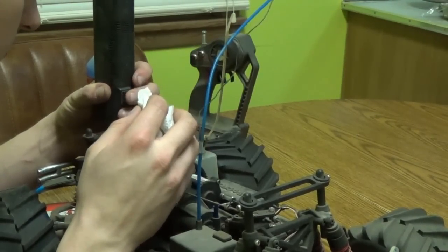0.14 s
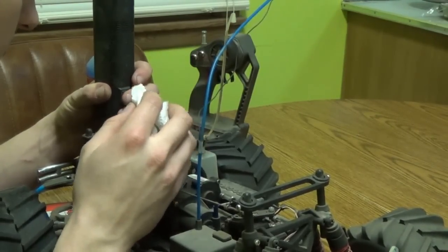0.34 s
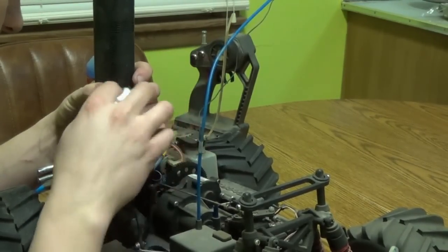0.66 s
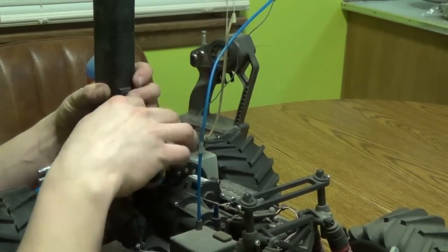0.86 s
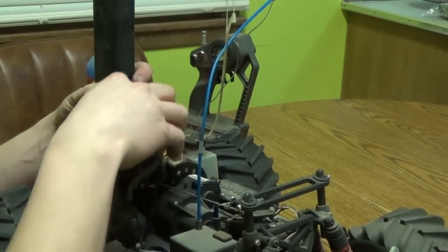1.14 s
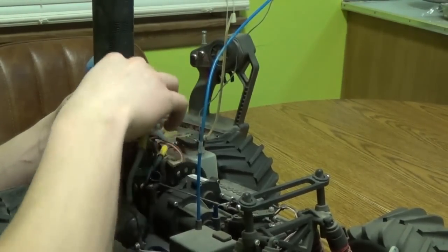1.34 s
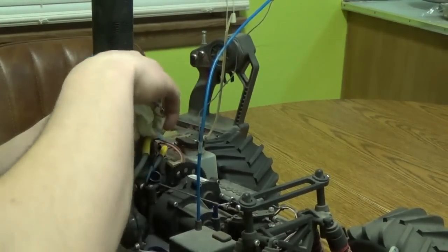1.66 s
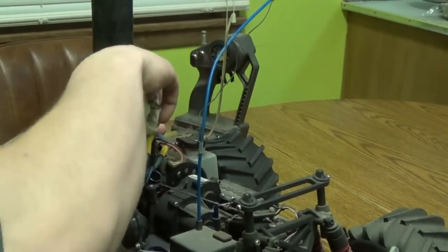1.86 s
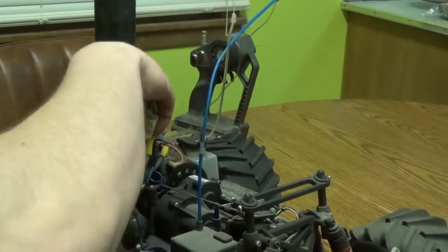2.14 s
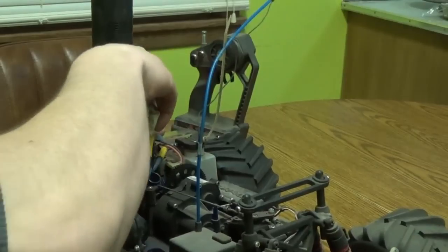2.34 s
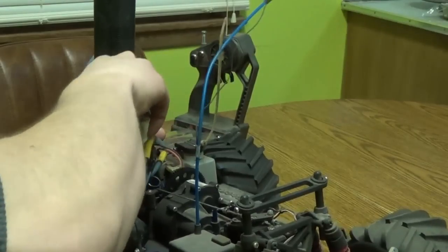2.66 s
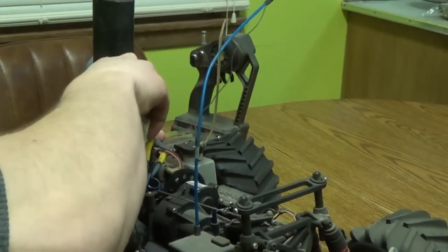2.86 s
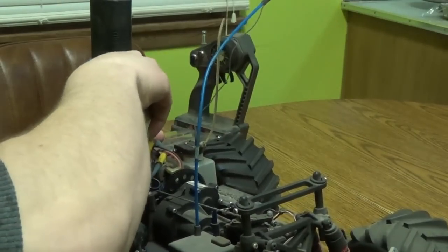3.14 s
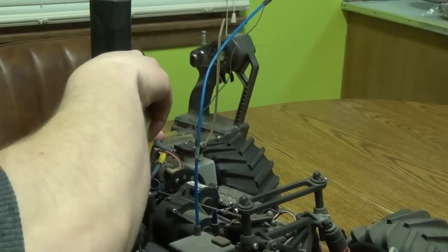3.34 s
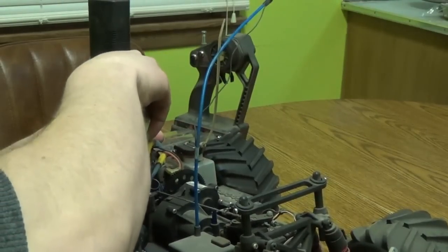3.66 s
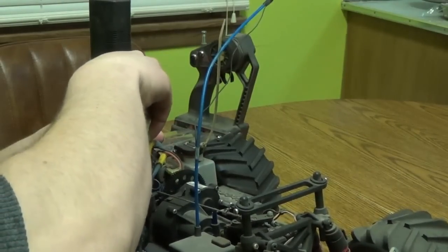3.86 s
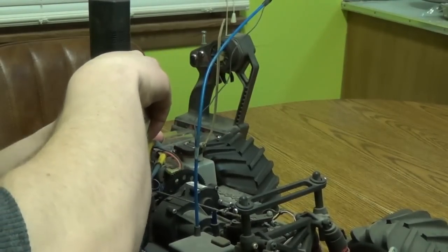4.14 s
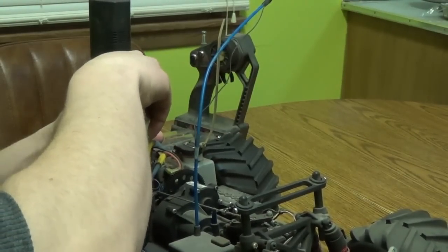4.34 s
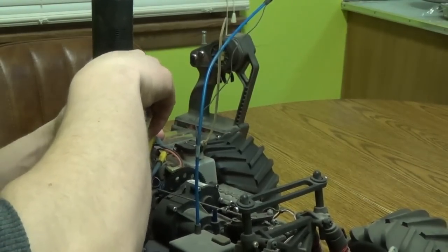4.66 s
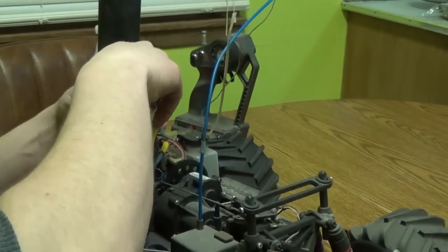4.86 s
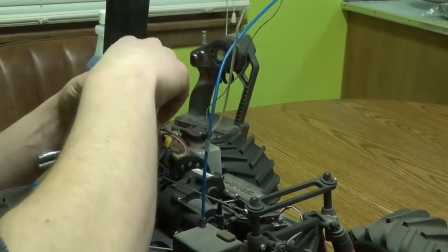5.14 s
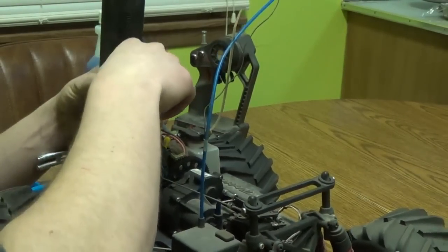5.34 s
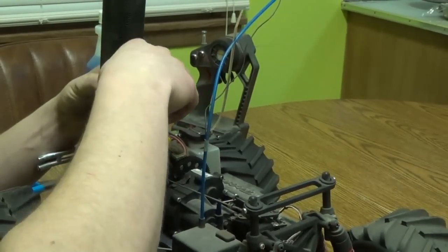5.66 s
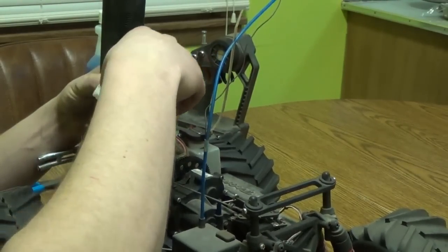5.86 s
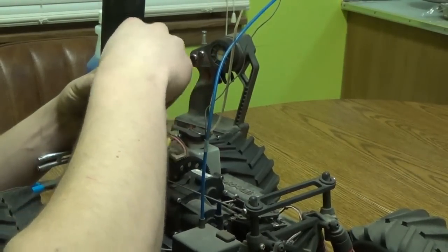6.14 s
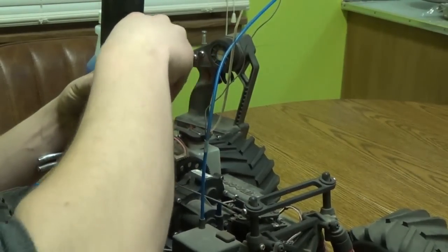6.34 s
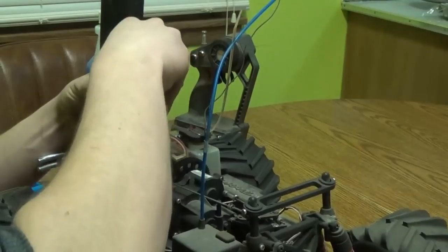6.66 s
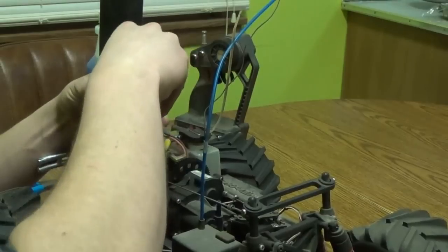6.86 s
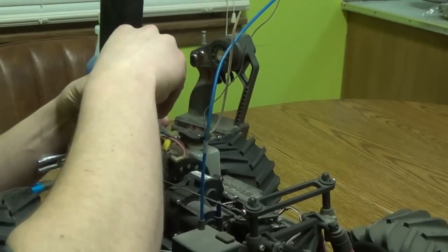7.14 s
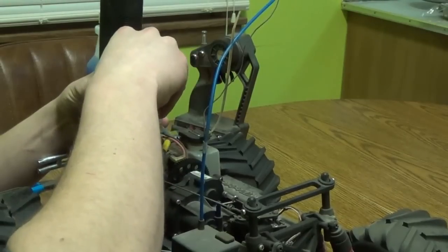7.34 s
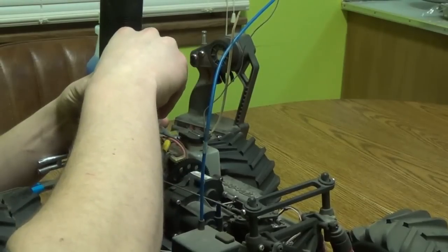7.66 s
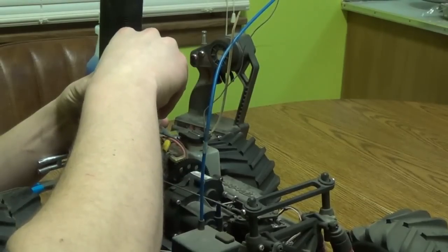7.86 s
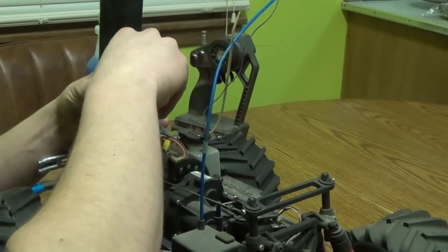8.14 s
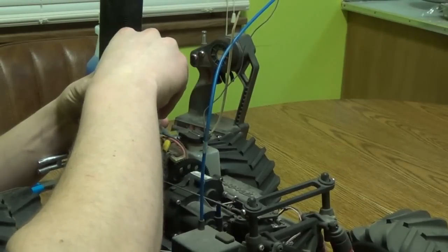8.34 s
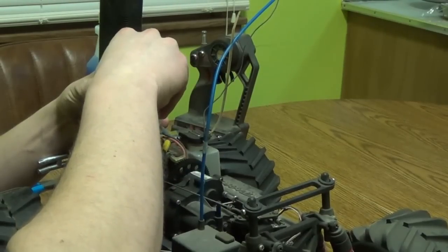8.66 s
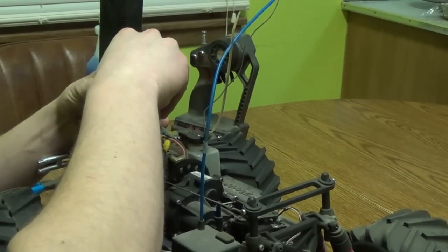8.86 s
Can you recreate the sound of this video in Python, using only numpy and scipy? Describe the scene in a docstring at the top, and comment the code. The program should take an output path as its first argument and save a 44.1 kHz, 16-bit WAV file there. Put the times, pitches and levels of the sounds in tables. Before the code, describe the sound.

Close up in a quiet kitchen, an electric starter is already cranking a small model engine: a bright, rattling gear whir with popping exhaust. It cuts after half a second with a brief freewheel hiss. Soft paper towel crackles and light chassis knocks fill the pause. Then the starter snaps on again and grinds on steadily to the end, whining and popping about sixteen times a second, the engine never catching.

```python
"""Kitchen table in a quiet room, close stereo microphone: a hand-held electric starter cranks
a small model engine twice; it does not fire. The gears rattle in the casing, whine at the rate
the teeth mesh, and hiss as the freewheel overruns; each crank turn pops the exhaust pipe once.
Between the tries, hands crackle a paper towel and nudge the chassis. Behind it all lie room air,
preamp hiss, faint steady tones and a regular tick."""
import sys
import numpy as np
from scipy import signal
from scipy.fft import rfft, irfft, next_fast_len
from scipy.io import wavfile
from scipy.ndimage import uniform_filter1d

SR = 44100
rng = np.random.default_rng(int(sys.argv[2]) if len(sys.argv) > 2 else 0)


def transcribe(u):
    """Save the signal u as a 16-bit wav file named by the first command-line argument.

    u: samples, shape (n,) or (channels, n), limited to [-1, 1]; the rate is SR.
    q: integer samples, one column per channel.
    """
    v = np.clip(np.atleast_2d(u).T, -1, 1)
    q = np.round(v * 32767).astype(np.int16)
    wavfile.write(sys.argv[1], SR, q)


N = 396459
T = np.arange(N) / SR  # seconds

# Levels are those ahead of the final mix and microphone; colour tables give only relative level.
# first try, crank turning unevenly, a row per exhaust port opening: time_s, pop_level_db
FIRST_TRY_POPS = [(0, -33), (.0581, -18.5), (.1291, -15), (.1915, -17.5), (.2583, -19.5), (.3521, -18.5),
                  (.4191, -20), (.4819, -17), (.5437, -17.5), (.6074, -17.5), (.724, -29)]
# second try from its first pop on: time_s, speed_turns_per_s
CRANK_SPEED = [(3.2283, 14.305), (3.4, 15.844), (3.9, 16.572), (4.8, 16.642), (5.0, 16.223), (5.4, 16.437),
               (6.6, 16.563), (7.4, 16.814), (9, 16.855)]
OFF_S, STOP_S, ON_S = 0.6, 0.9, 3.146  # power off, crank at rest, power on again
REST_TURNS = 0.8  # the crank rests this far past the last pop
# how far the hand has slid along the casing: time_s, grip_0_to_1
HAND_SLIDE = [(0, .35), (3.2, .07), (3.45, .4), (4.8, .35), (5.6, .5), (7.86, 1), (8.99, .7)]
# rattle colour under the grip of the first try: frequency_hz, level_db_per_hz
FIRST_TRY_COLOUR = [(30, -36), (80, -38), (130, -28), (320, -18), (500, -24), (900, -17.5), (1350, -14.5),
                    (1620, -8.5), (2180, -7.5), (3040, -1), (4350, -9), (6600, -5), (8580, -11),
                    (11400, -10), (14000, -14), (15600, -22)]
# rattle colour at the two grips of the second try: frequency_hz, level_db_per_hz
LOW_GRIP_COLOUR = [(30, -34), (80, -40), (130, -32), (320, -19), (550, -21), (900, -17.5), (1210, -13.5),
                   (1950, -3.5), (2130, -6.5), (2630, -4), (3040, -0.5), (4840, -8), (6000, -4),
                   (7180, -6.5), (12400, -7.5), (15600, -15)]
HIGH_GRIP_COLOUR = [(30, -35), (80, -38), (130, -27), (320, -15), (550, -18.5), (900, -18), (1430, -10),
                    (1600, -7.5), (2800, -7), (3190, -1.5), (4350, -11), (6930, -8), (8280, -10.5),
                    (10900, -8.5), (13700, -15.5), (15600, -25)]
# fixed resonances of casing and room: frequency_hz, width_hz, low_grip_db, high_grip_db
FIXED_RESONANCES = [(735, 30, 13, 12), (1633, 72, 6, -1), (2410, 120, -4, -9), (2782, 25, -8, -1),
                    (2953, 34, -12, 6), (3050, 26, -5, 9), (3143, 18, 5, 13), (3271, 18, 2, 11),
                    (3540, 33, 4, -4), (3790, 80, 4, 0), (5115, 13, -11, 0), (5580, 190, -7, -3),
                    (6060, 120, 2.5, -3), (6880, 95, -3, 4), (7690, 46, -5, 12), (9700, 390, 1.5, -13)]
# rattle swelling with crank angle: times_per_turn, depth_db, lag_turns, deepest_at_hz
ANGLE_BEATS = [(1, 2, .15, 1800), (1, 1.3, 0.58, 3200), (1, 0.7, 0.6, 12000), (4, -0.5, .1, 3100),
               (8, 0.9, .2, 3100), (12, 1, 0.29, 1700)]
# tooth mesh tones: teeth_per_turn, level_db (re rattle)
MESH_TONES = [(118.3, -18.5), (96.3, -27.5), (128.5, -30), (189, -23), (302, -31), (402.6, -28)]
# fuzzy whines following the speed:
# times_per_turn, width_hz, base_db (times 1.5 - grip), added_db (times grip)
HOWL_BANDS = [(187.4, 125, -11, -10.5), (367, 170, -10, -31)]
# gear level: first_try_db, second_try_db
GEAR_DB = (-17.8, -17)
ENGAGE_S, ENGAGE_BEND = 0.045, 1.35  # rise at power on: seconds, power of time
RUNDOWN_S, RUNDOWN_BEND = 0.105, 2.6  # seconds after power off to lose 10 dB; power of time
# hiss of the overrunning freewheel: frequency_hz, level_db_per_hz
FREEWHEEL_COLOUR = [(240, -46), (400, -12), (502, -31), (701, -13), (1120, -19), (1610, -1.5), (2620, -10),
                    (3660, 0), (5110, -15), (10900, -16), (15000, -28)]
COAST_DB, COAST_PEAK_S = -22.5, 0.655
COAST_RISE_S, COAST_FALL_S, COAST_BEND = 0.04, 0.125, 1.8  # seconds per 10 dB; bend of the fall
# exhaust pipe and table top ringing after a pop: frequency_hz, level_db, t60_s, rise_s
PIPE_MODES = [(136, -22, 0.28, 0.0017), (205, -15, 0.15, 0.0016), (279, -13, 0.031, 0.0012),
              (320, -12, 0.16, 0.0023), (322, 4, 0.066, .0028), (438.4, -7, 0.04, 0.0021),
              (549.3, -18.5, 0.18, 0.0028), (595, -11.5, 0.058, 0.0014), (638, -17.5, 0.2, 0.0014),
              (685, -16, 0.18, 0.0014), (701, -9, 0.13, 0.003), (673, -15, 0.057, .0008),
              (735.6, -8.5, 0.28, 0.0067), (758, -25, 0.52, 0.006), (797, -20.5, 0.24, 0.0057),
              (838, -25, 0.18, 0.0011), (1100, -25, 0.03, 0.00039)]
POP_DB, POP_GROWTH_DB_PER_S = -18.5, 0.3  # second try: the pops grow a little as it runs
# paper towel colour: frequency_hz, level_db_per_hz
TOWEL_COLOUR = [(88, -64), (150, -61), (230, -38), (269, -10), (620, -4), (710, -8), (1490, 3),
                (14400, -10), (15600, -16.5)]
# paper towel, a row per crumple: peak_s, level_db, rise_s, fall_s (each over 10 dB)
TOWEL_CRUMPLES = [(.89, -52, .03, .2), (1.1, -50, .15, .2), (1.31, -50, .1, .1), (1.47, -49, .1, .16),
                  (1.72, -54, .07, .1), (1.86, -52, .08, .3), (2.03, -50, .04, .05), (2.144, -47, .004, .2),
                  (2.45, -53, .07, .08), (2.64, -55, .02, .05), (2.99, -48, .004, .014),
                  (3.09, -60, .1, .05)]
# nudges of the chassis: start_s, level_db, thud_hz, t60_s, scuff_db
CHASSIS_NUDGES = [(1.73, -59, 300, .15, -70), (1.888, -49, 314, 0.068, -66), (2.03, -52, 403, .08, -58),
                  (2.142, -50, 865, 0.34, -40), (2.21, -62, 1500, .3, -65), (2.425, -61, 300, .3, -56),
                  (2.79, -55, 320, 0.17, -52.5), (2.972, -51, 340, .12, -60), (2.992, -68, 900, .06, -60),
                  (3.093, -66, 600, .06, -62)]
# chassis modes around a thud: factor on thud_hz, level_db, factor on t60_s
CHASSIS_MODES = [(1, 4.5, 0.39), (1.45, -3.5, 0.67), (2.3, -1.5, .45), (3.7, -5.5, .3), (6.1, -8.5, .2)]
# scuff colour: frequency_hz, level_db_per_hz
SCUFF_COLOUR = [(120, -49), (200, -22), (597, -5), (829, -2), (1090, -8), (1920, -2), (2760, -13),
                (5520, -15), (15600, -42)]
# echo decay in the room: frequency_hz, t60_s
ROOM_DECAY = [(150, 0.42), (700, 0.28), (3000, 0.47), (8000, 0.37), (15000, 0.14)]
# room air and preamp hiss: frequency_hz, level_db_per_hz
FLOOR_COLOUR = [(15, -54), (25, -27), (75, -13.5), (234, -2), (764, -1.5), (922, 2), (1110, -2), (3950, -3),
                (12900, -8.5), (15600, -8)]
FLOOR_DB = -57.5
# mains hum and a screen's scan whistle: frequency_hz, level_db
STEADY_TONES = [(240, -80.5), (7881, -81.5), (15735, -75)]
# faint regular tick running throughout, a single row:
# one_tick_at_s, ticks_per_s, pitch_hz, level_db, t60_s
FAINT_TICK = (.982, 14.985, 3900, -53, .011)
# lean of the port pair: frequency_hz, left_minus_right_db
PORT_LEAN = [(60, -7), (125, 2.5), (300, 1.1), (700, -2.5), (1400, -.5), (3000, -2), (5000, 0.1),
             (9000, 1.2)]
# stereo width of the sound: frequency_hz, side_gain_db
STEREO_WIDTH = [(60, -1.5), (125, -1.5), (300, -3.5), (700, 5.5), (1500, -5), (3000, -2), (6000, -2),
                (8500, -8), (11000, -36)]
# microphone response: frequency_hz, gain_db
MIC_RESPONSE = [(25, 1), (70, -4), (110, -7), (140, 0.4), (13000, -1.05), (15000, -2.5), (15700, -8)]
BAND_LIMIT_HZ = 15790


def starter():
    """Both tries: gear noise under the motor's power envelope, freewheel hiss, and exhaust pops."""
    turns = crank()
    grip = np.clip(curve(HAND_SLIDE, order=1), 0, 1)
    since_off = np.maximum(T - OFF_S, 0)
    first_try = gain_of(GEAR_DB[0] - 10 * (since_off / RUNDOWN_S) ** RUNDOWN_BEND)
    engaging = np.clip((T - ON_S) / ENGAGE_S, 0, 1) ** ENGAGE_BEND
    second_try = gain_of(GEAR_DB[1]) * engaging
    gears = (first_try + second_try) * (rattle(turns, grip) + whine(turns) + howl(turns, grip))
    later_pop_db = POP_DB + POP_GROWTH_DB_PER_S * (T - ON_S)
    pop_db = np.where(T < ON_S, curve(FIRST_TRY_POPS, order=1), later_pop_db)
    return gears + freewheel(), exhaust(turns, pop_db)


def crank():
    """Crank angle in turns: uneven first turns, a rest, then a run at the tabled speed."""
    opens = [time for time, db in FIRST_TRY_POPS]
    count = len(opens)
    again = CRANK_SPEED[0][0]
    rest = count - 1 + REST_TURNS
    times = opens + [STOP_S, ON_S, again]
    slow = np.interp(T, times, [*range(count), rest, rest, count])
    return slow + np.cumsum((T >= again) * curve(CRANK_SPEED, order=1)) / SR


def rattle(turns, grip):
    """Dense tooth knocks ring fixed resonances; some weaken and others grow as the hand slides."""
    hz, t, z = signal.stft(grains(per_s=16000, spread_db=1.9), SR, nperseg=256, noverlap=192)
    angle = np.interp(t, T, turns)
    beat_db = 0
    for times, depth_db, lag, centre_hz in ANGLE_BEATS:
        nearness = np.exp(-np.log((hz[:, None] + 1) / centre_hz) ** 2 / 0.21)
        beat_db = beat_db + depth_db * nearness * np.cos(2 * np.pi * times * (angle - lag))
    patches = uniform_filter1d(rng.standard_normal(z.shape), 3, 0)  # blurred over frequency
    patches = evened(uniform_filter1d(patches, 60, 1))  # and over time
    # the grip shakes, heard most in the treble
    flutter = np.interp(t, T, drift(31)) * np.clip(hz[:, None] / 8000, 0, 1)
    shaped = z * gain_of(beat_db + 0.73 * patches + 0.45 * flutter)
    knocks = signal.istft(shaped, SR, nperseg=256, noverlap=192)[1][:N]

    size = next_fast_len(N)
    hz = np.fft.rfftfreq(size, 1 / SR)
    spectrum = rfft(knocks, size)

    def held(colour, column):
        """Knocks through the resonances under one grip, at rms 1."""
        response = 1.69  # sound that bypasses the resonances
        for row in FIXED_RESONANCES:
            response = response + gain_of(row[column]) / (1 + 2j * (hz - row[0]) / row[1])
        return evened(irfft(spectrum * response * gain_of(read(colour, hz)), size)[:N])

    low, high = held(LOW_GRIP_COLOUR, 2), held(HIGH_GRIP_COLOUR, 3)
    first = held(FIRST_TRY_COLOUR, 2)
    return np.where(T < STOP_S, first, (1 - grip) * low + grip * high)


def whine(turns):
    """Mesh tones; compression slows the crank once a turn, which splits them into sidebands."""
    angle = turns + 0.0022 * np.sin(2 * np.pi * turns) + 0.0014 * drift(2.8)
    speed = uniform_filter1d(np.gradient(turns) * SR, 800)  # turns a second
    loaded = np.clip(speed / 16.3, 0, 1) ** 8  # the teeth only sing near full speed
    tones = 0
    for teeth, db in MESH_TONES:
        level = gain_of(db + 2.5 * drift(14))
        tones = tones + level * np.sqrt(2) * np.sin(2 * np.pi * teeth * angle)
    return loaded * tones


def howl(turns, grip):
    """Uneven teeth turn the fast mesh tones into narrow bands of noise that follow the speed."""
    speed = np.clip(uniform_filter1d(np.gradient(turns) * SR, 5000), 15.3, None)  # turns a second
    noise = rng.standard_normal(N)
    out = 0
    for times, width, base_db, added_db in HOWL_BANDS:
        level = gain_of((1.5 - grip) * base_db + grip * added_db)
        out = out + level * evened(resonate(noise, times * speed, width))
    return out


def freewheel():
    """Power off, the freewheel overruns: noise swells to a peak, then dies away, slowly at first."""
    level = gain_of(COAST_DB + swell(COAST_PEAK_S, COAST_RISE_S, COAST_FALL_S, COAST_BEND))
    return level * evened(coloured(rng.standard_normal(N), FREEWHEEL_COLOUR))


def exhaust(turns, level_db):
    """One pop a turn into the pipe, suction first, with a puff of air that also rings it."""
    new_turn = np.diff(np.floor(turns), prepend=np.floor(turns[0]) - 1)
    opens = new_turn * gain_of(level_db + 0.8 * drift(15))
    puff = signal.lfilter([1], [1, -np.exp(-1 / (0.03 * SR))], opens) * rng.standard_normal(N)
    t = T[:SR // 2]
    ring = 0
    for hz, db, t60, rise in PIPE_MODES:
        envelope = gain_of(db - 60 * t / t60) * (1 - np.exp(-t / rise))
        ring = ring + envelope * np.sin(2 * np.pi * hz * t)
    # a small pipe radiates no deep bass
    ring = signal.lfilter(*signal.butter(2, 125, "high", fs=SR), ring)
    return -signal.oaconvolve(opens + 0.0021 * puff, ring)[:N]


def hands():
    """Everything the hands do at the table: the paper towel and the nudged chassis."""
    return paper_towel() + nudges()


def paper_towel():
    """Paper crackles under the fingers: sparse clicks over noise, swelling at each crumple."""
    paper = 0.32 * grains(per_s=660, spread_db=6.5) + rng.standard_normal(N)
    swells = [gain_of(db + swell(peak, rise, fall)) for peak, db, rise, fall in TOWEL_CRUMPLES]
    return np.max(swells, axis=0) * evened(coloured(paper, TOWEL_COLOUR))


def nudges():
    """Each nudge is a knock of decaying chassis modes and a scuff of grainy noise."""
    out = np.zeros(N)
    grit = grains(per_s=1500, spread_db=2.5) + rng.standard_normal(N)
    scuff = evened(coloured(grit, SCUFF_COLOUR))
    t = T[:SR // 3]
    onset = 1 - np.exp(-t / 0.00089)
    for start, db, hz, t60, scuff_db in CHASSIS_NUDGES:
        part = slice(round(start * SR), round(start * SR) + len(t))
        knock = 0
        for factor, mode_db, short in CHASSIS_MODES:
            decay = gain_of(db + mode_db - 60 * t / (t60 * short))
            knock = knock + decay * np.sin(2 * np.pi * hz * factor * t)
        scrape = gain_of(scuff_db - 60 * t / t60) * scuff[part]
        out[part] += (knock + scrape) * onset
    return out


def room(x):
    """Sparse taps of random sign, other ones for each port, each band dying at its own speed."""
    taps = np.zeros((2, SR // 2))
    slots = np.arange(120, SR // 2 - 20, 20)  # samples; one tap in each slot
    at = slots + rng.integers(0, 20, (2, len(slots)))
    np.put_along_axis(taps, at, rng.choice([-1., 1.], at.shape), 1)
    hz, t, z = signal.stft(taps, SR, nperseg=256)
    decay = gain_of(-60 * t / read(ROOM_DECAY, hz)[:, None])
    tail = signal.istft(z * decay, SR, nperseg=256)[1]
    return signal.fftconvolve(x[None], tail / np.linalg.norm(tail[0]), axes=1)[:, :N]


def background():
    """Room air and preamp hiss as partly shared noise, with steady tones and the tick."""
    hiss = rng.standard_normal((2, N)) + 1.1 * rng.standard_normal(N)  # own noise + shared noise
    tones = 0
    for hz, db in STEADY_TONES:
        tones = tones + gain_of(db) * np.sqrt(2) * np.sin(2 * np.pi * hz * T)
    return gain_of(FLOOR_DB) * evened(coloured(hiss, FLOOR_COLOUR)) + tones + faint_tick()


def faint_tick():
    """A short decaying sine at a steady rate throughout, each one a little louder or softer."""
    one_tick_at, per_s, hz, db, t60 = FAINT_TICK
    since = (T - one_tick_at) % (1 / per_s)
    which = ((T - one_tick_at) // (1 / per_s)).astype(int)  # negative ones count from the end
    uneven_db = 3.0 * rng.standard_normal(200)[which]
    return gain_of(db + uneven_db - 60 * since / t60) * np.sin(2 * np.pi * hz * since)


def gain_of(db):
    """Decibels to gain."""
    return 10 ** (np.asarray(db) / 20)


def evened(x):
    """Scales to rms 1."""
    return x / np.sqrt(np.mean(x ** 2) + 1e-20)


def read(points, hz):
    """A spectrum table at the given frequencies, interpolated over log frequency."""
    f, value = np.transpose(points)
    return np.interp(np.log(hz + 1), np.log(f + 1), value)


def coloured(x, points, scale=1):
    """Filters by a spectrum table in dB."""
    length = x.shape[-1]
    size = next_fast_len(length)
    gain = gain_of(scale * read(points, np.fft.rfftfreq(size, 1 / SR)))
    return irfft(rfft(x, size) * gain, size)[..., :length]


def curve(rows, order):
    """One column of a time table at every sample."""
    table = np.array(rows)
    return np.interp(T, table[:, 0], table[:, order])


def swell(peak_s, rise_s, fall_s, bend=1):
    """Level in dB around a peak: 10 dB down at rise_s before it and fall_s after it."""
    late = T - peak_s
    return -10 * np.where(late < 0, -late / rise_s, (np.maximum(late, 0) / fall_s) ** bend)


def grains(per_s, spread_db):
    """Clicks of random time, sign and size, a few of them large, at rms 1."""
    size = gain_of(spread_db * np.minimum(rng.exponential(1, N), 5))
    sign = rng.choice([-1, 1], N)
    return evened(size * sign * (rng.random(N) < per_s / SR))


def drift(corner_hz):
    """Slow random wander of rms 1: noise rolled off above the corner."""
    size = next_fast_len(N)
    hz = np.fft.rfftfreq(size, 1 / SR)
    slow = rfft(rng.standard_normal(size)) / (1 + (hz / corner_hz) ** 4)
    return evened(irfft(slow, size)[:N])


def resonate(x, hz, width):
    """Shifts the curve hz down to zero, smooths twice, and shifts back: a moving resonance."""
    turn = np.exp(2j * np.pi * np.cumsum(hz) / SR)
    r = np.exp(-np.pi * width / SR)
    return 2 * (turn * signal.lfilter([(1 - r) ** 2], [1, -2 * r, r ** 2], x / turn)).real


def scene():
    """Direct sound plus the room's answer; the hand-held starter sways, so its echoes keep changing."""
    gears, pops = starter()
    near = hands()
    wet = room(gain_of(-13.5) * pops + gain_of(-6) * near)
    for k in range(3):  # three echo patterns trade places
        sway = np.sqrt(2 / 3) * np.cos(np.pi * (0.6 * T + k / 3))
        wet += room(gain_of(-6) * gears * sway)
    return gain_of(-1.46) * (gears + pops + near) + wet + background()


def record(dry):
    """The ports lean a little; the stereo image narrows to mono in the treble; then the
    microphone response dips around 110 Hz and eases off at the top, up to the band limit."""
    left = coloured(dry[0], PORT_LEAN, scale=1 / 2)
    right = coloured(dry[1], PORT_LEAN, scale=-1 / 2)
    mid = (left + right) / 2
    side = coloured((left - right) / 2, STEREO_WIDTH)
    pair = coloured(np.array([mid + side, mid - side]), MIC_RESPONSE)
    low_pass = signal.firwin(1023, BAND_LIMIT_HZ, window=("kaiser", 9), fs=SR)
    return signal.oaconvolve(pair, low_pass[None], "same")


dry = scene()
out = record(dry)
transcribe(out)
```